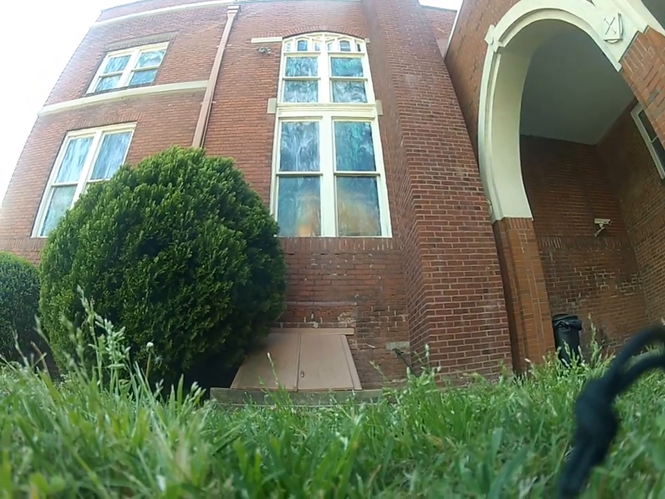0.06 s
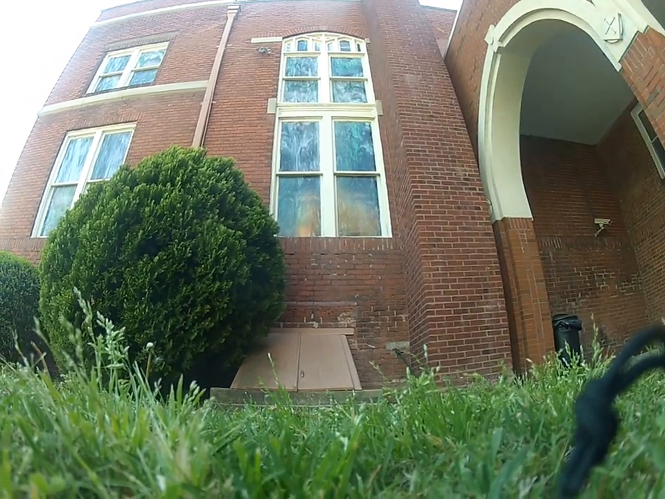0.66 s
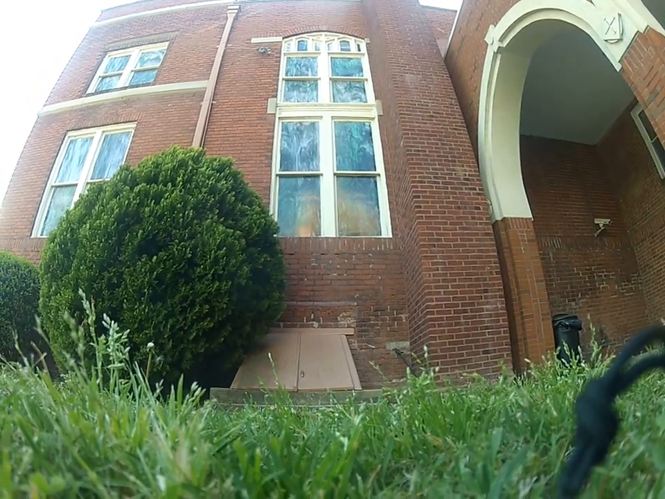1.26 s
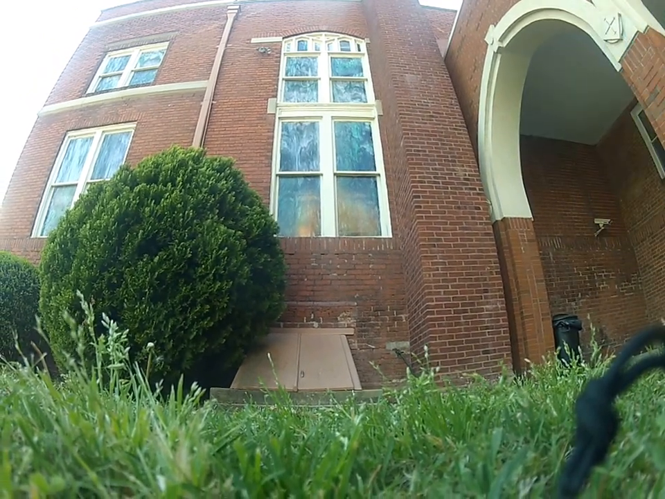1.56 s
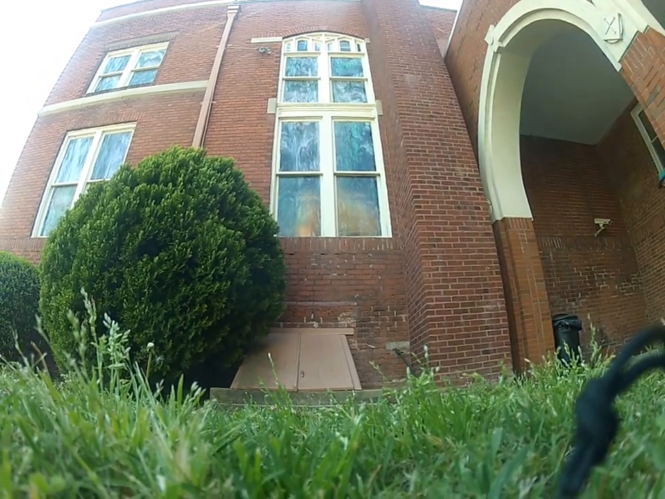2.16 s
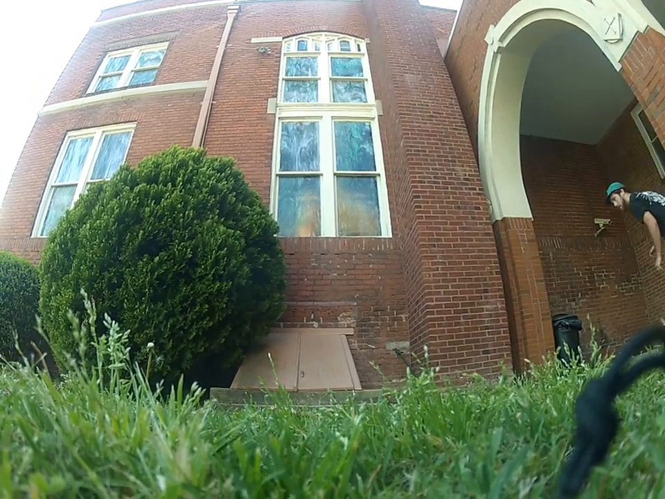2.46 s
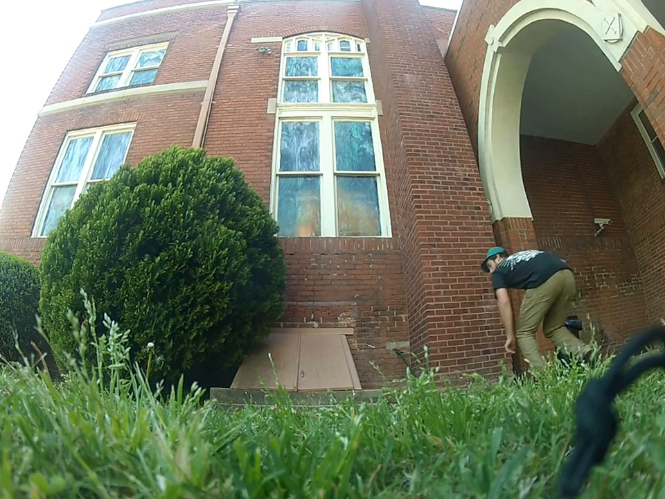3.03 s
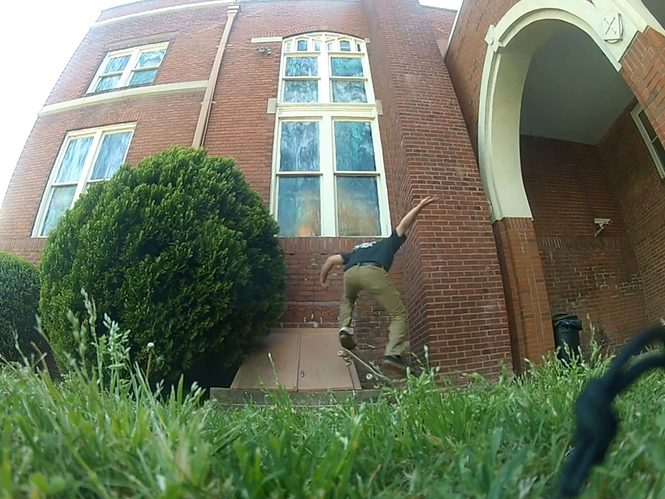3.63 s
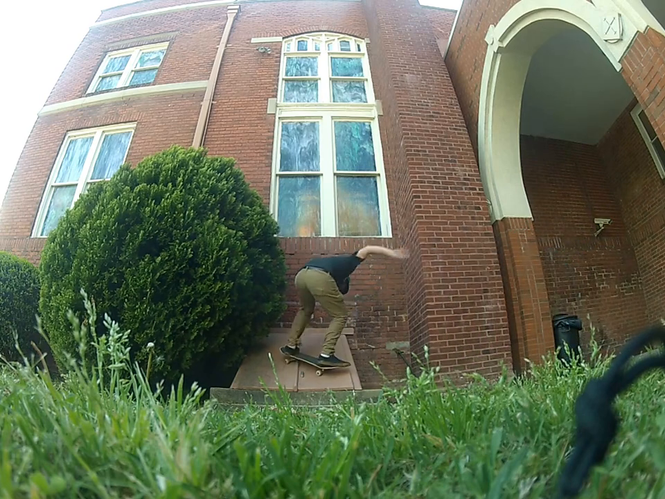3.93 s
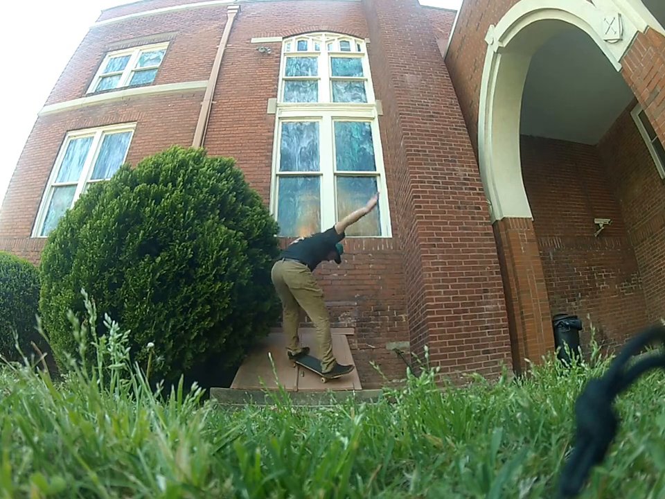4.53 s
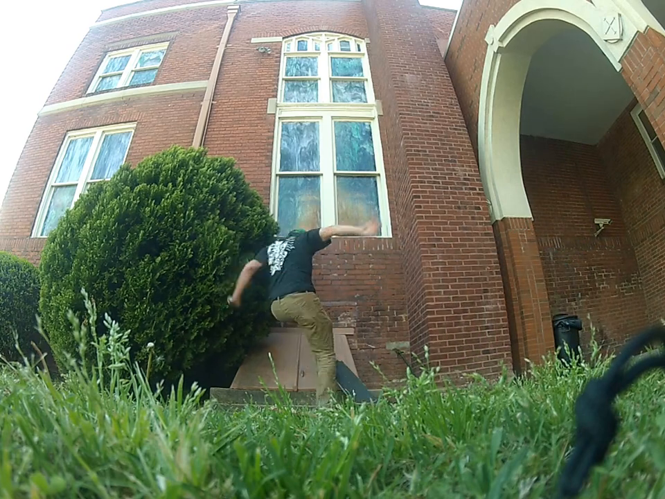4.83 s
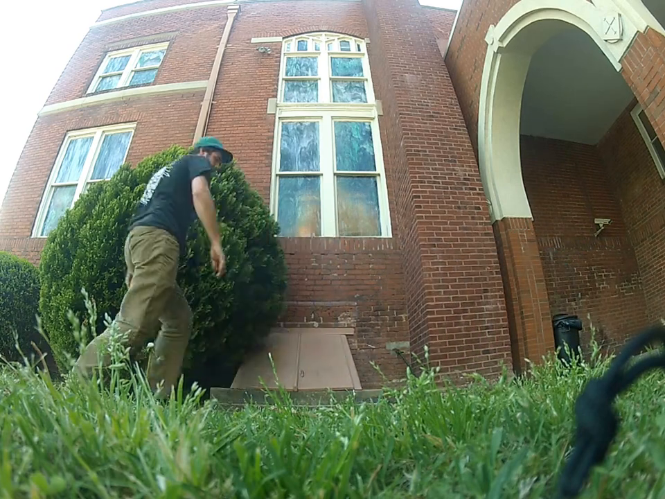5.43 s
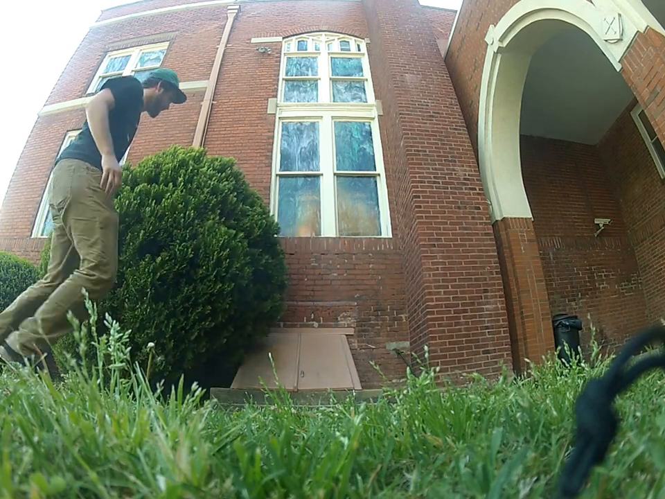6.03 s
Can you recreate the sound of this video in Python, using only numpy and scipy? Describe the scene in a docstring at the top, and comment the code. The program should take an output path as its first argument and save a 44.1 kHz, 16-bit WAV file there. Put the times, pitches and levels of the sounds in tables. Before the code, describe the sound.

A skateboard clacks down, rolls, bangs across a booming metal cellar door, then tumbles off and rolls away, sounding muffled outdoors.

```python
"""Skateboard over a cellar door

A skateboard is thrown down in a brick porch, rolls out and pops onto a slanted steel cellar door.
The door booms and rattles, a wheel squeals in the turn, then the board drops off, tumbles and rolls away.
Before all this, a bird chirps and a shoe scuffs; a town rumbles far away throughout.
Most of the sound lies below 700 Hz, muffled as if by a closed camera case lying in the grass."""
import sys
import numpy as np
from scipy import signal
from scipy.fft import rfft, irfft
from scipy.io import wavfile
from scipy.ndimage import map_coordinates

SR = 44100
rng = np.random.default_rng(int(sys.argv[2]) if len(sys.argv) > 2 else 0)


def unload_audio(sound):
    """Save the sound as a 16-bit wav file, at the path given as the first command line argument."""
    columns = np.transpose(np.atleast_2d(sound))
    # keep every value between -1 and 1, then stretch to whole-number steps
    steps = np.round(np.clip(columns, -1, 1) * 32767)
    wavfile.write(sys.argv[1], SR, steps.astype(np.int16))


N = 277248
REACH_DOOR_S, LEAVE_DOOR_S = 3.7, 4.9


def amp(db):
    """Turn decibels into a multiplier."""
    return 10 ** (np.asarray(db) / 20)


def unit(x):
    """Scale a sound to an average (rms) level of 1."""
    return x / np.sqrt(np.mean(x ** 2) + 1e-20)


def gain(spectrum, size):
    """A tone curve through (pitch_hz, level_db) points, falling 36 dB an octave past both ends."""
    hz, db = np.transpose(spectrum)
    octave = np.log2(np.fft.rfftfreq(size, 1 / SR) + 1)
    outside = np.abs(octave - np.clip(octave, np.log2(hz[0]), np.log2(hz[-1])))
    return amp(np.interp(octave, np.log2(hz), db) - 36 * outside) + 1e-6


def noise(spectrum):
    """Noise with this tone colour, at an average level of 1."""
    return unit(irfft(rfft(rng.standard_normal(N)) * gain(spectrum, N), N))


def pulse(spectrum, size=4096):
    """The shortest tap with this tone colour (a minimum-phase pulse)."""
    cepstrum = irfft(np.log(gain(spectrum, size)))
    cepstrum[1:size // 2] *= 2
    cepstrum[size // 2 + 1:] = 0
    return irfft(np.exp(rfft(cepstrum)))


def wobble(rate):
    """A smooth curve through `rate` random points a second."""
    return map_coordinates(rng.standard_normal(int(N * rate / SR) + 4), [np.arange(N) * rate / SR])


def fade(fade_s):
    """A one-second curve that falls by 60 dB every fade_s."""
    return np.exp(-np.log(1000) * np.arange(SR) / SR / fade_s)


def since(s):
    """Seconds gone by since time s, zero before it."""
    return np.maximum(np.arange(N) / SR - s, 0)


def swell(start, end, rise_s, fall_db_per_s):
    """A level that rises from the start, holds to the end, then dies away."""
    return np.minimum(since(start) / rise_s, 1) * amp(-fall_db_per_s * since(end))


def add(track, s, sound):
    """Mix a sound in at time s."""
    part = track[round(s * SR):][:len(sound)]
    part += sound[:len(part)]


def ring(notes, attack_s, spread_db, detune):
    """A struck object, peak 1; each blow shares its force differently among the notes."""
    t = np.arange(SR) / SR
    sound = np.zeros(SR)
    for hz, db, fade_s in notes:
        force = amp(db + spread_db * rng.normal()) * rng.choice([-1, 1])
        sound += force * fade(fade_s) * np.sin(2 * np.pi * hz * (1 + detune * rng.normal()) * t)
    sound *= 1 - np.exp(-t / attack_s)
    return sound / np.abs(sound).max()


def echoed(sound, colour, early_db, early_s, late_db, late_s):
    """A sound of peak 1, then a wash of echoes: one part fades quickly, one slowly."""
    scatter = unit(irfft(colour * np.exp(2j * np.pi * rng.random(len(colour))), SR))
    envelope = np.hypot(amp(early_db) * fade(early_s), amp(late_db) * fade(late_s))
    direct = np.pad(sound, (0, SR - len(sound))) / np.abs(sound).max()
    return direct + scatter * envelope * (1 - fade(0.03))


# Tone of far traffic: pitch_hz, level_db
TRAFFIC_TONE = [(22, -28), (35, -3.5), (60, -3.5), (130, -1.5), (220, -3.5), (420, -8.5), (620, -7),
                (720, -11), (850, -20.5), (1000, -24), (1400, -37), (2800, -40.5), (4200, -48.5),
                (5800, -56.5)]


def town():
    """Far traffic rumbles under a faint steady whine."""
    whine = amp(-84) * noise([(4950, -24), (5110, 0), (5270, -24)])
    return amp(-37 + 0.37 * wobble(24)) * noise(TRAFFIC_TONE) + whine


def bird():
    """One faint far chirp, smeared by distance."""
    t = np.arange(N) / SR
    chirp = np.exp(-((t - 1.355) / .055) ** 2)
    return amp(-72) * chirp * noise([(2800, -25), (3300, -8), (3600, 7), (3900, -25)])


# Shoe scuffs before the run-up: start_s, level_db
SHOE_SCUFFS = [(1.543, -46.5), (1.612, -43.5)]
# Tones of the scrape and of the hollow echo: pitch_hz, level_db
SCRAPE_TONE = [(1200, -18), (2100, -12), (2550, -9), (2850, 1), (3350, -9), (3900, -7), (4300, -19),
               (5500, -27)]
HOLLOW_TONE = [(150, -32), (300, -8.5), (410, -18), (455, 1.5), (500, -4.5), (575, -4), (620, 4),
               (665, -3.5), (770, -8.5), (850, -13), (950, -20.5), (1100, -25), (1600, -38)]


def scuffs():
    """Short bright scrapes of a shoe linger a little and stir the hollow porch."""
    out, t = np.zeros(N), np.arange(N) / SR
    for s, db in SHOE_SCUFFS:
        scrape = np.exp(-((t - s) / 0.0088) ** 2)
        linger = amp(-12.5) * swell(s, s, rise_s=.004, fall_db_per_s=68)
        stir = amp(7) * swell(s, s, rise_s=.005, fall_db_per_s=28)
        out += amp(db) * ((scrape + linger) * noise(SCRAPE_TONE) + stir * noise(HOLLOW_TONE))
    return out


# Single knocks of tail, wheel or deck edge: start_s, level_db, thud_offset_db, click_offset_db
BOARD_KNOCKS = [(1.883, -7.5, -20, -26.5), (1.908, -0.5, -42, -20.5), (2.767, -17.5, -2.5, -22),
                (2.797, -11, -11, -23), (2.828, -15, -8, -21), (3.363, -13, -1.5, -23),
                (3.409, -15, 2, -21), (3.522, -17.5, -5, -23), (3.567, -8.5, -11.5, -18.5),
                (3.802, -8.5, -25, -20), (3.838, -4, -15, -38), (3.899, -6.5, -16.5, -19),
                (3.945, -11.5, -4.5, -23), (4.332, -23, -0.5, -24), (4.4, -20.5, -25, -26),
                (4.57, -10.5, -12, -15), (4.597, -9, -6.5, -34), (4.784, -4.5, -22, -31.5),
                (4.795, -2.5, -22, -35.5), (4.965, -16, -2, -17.5), (4.996, -11, -27, -20.5),
                (5.05, -6.5, -24, -19.5), (5.119, -15, -7, -20.5), (5.178, -11, -20, -18),
                (5.191, -12.5, -26, -27), (5.397, -16.5, -8, -12), (5.424, -15, -28, -36),
                (5.984, -25.5, -25, -29), (6.047, -45, -9, -3), (6.212, -40, -24, -10)]
# The board comes down: start_s, gap_s, level_db, thud_offset_db, click_offset_db, loss_per_touch_db
# (a negative loss means the weight is building)
BOARD_LANDINGS = [(1.896, .049, 0, -23, -27.5, 3.5), (2.588, .018, -9.5, 0, -24.5, -0.2),
                  (3.736, .0168, -4, -5.5, -25, 1), (4.652, .0195, -2.5, -15, -27, 0.5)]


def blows(start, end):
    """List the blows between two times: four touches for each landing, plus the single knocks."""
    touches = [(s + k * gap_s, db - k * loss_db, thud_offset, click_offset)
               for s, gap_s, db, thud_offset, click_offset, loss_db in BOARD_LANDINGS for k in range(4)]
    return [row for row in touches + BOARD_KNOCKS if start <= row[0] < end]


# Notes of the bending wooden deck, and of its edge and metal axles: pitch_hz, level_db, fade_s
DECK_NOTES = [(316, 2.5, 0.018), (496, -8.5, 0.086), (544, 11, 0.014), (633, 4.5, 0.029),
              (671, -5.5, 0.035), (784, -11, 0.037), (870, -21.5, 0.014)]
CLACK_NOTES = [(1090, -3, 0.0075), (1330, -6.5, 0.011), (1730, 4, 0.0065), (2090, -9, 0.019),
               (2300, -4, 0.0075), (2777, -3.5, 0.013), (3415, -1, 0.0067), (4000, -21, .004)]
# Tones of a dull thud and a bright click: pitch_hz, level_db
THUD_TONE = [(25, -26), (70, -19.5), (135, 0.5), (175, -5.5), (240, 0.5), (380, -3.5), (700, -21),
             (1500, -76)]
CLICK_TONE = [(500, -33), (1000, -2), (1350, 2), (1650, -2), (2050, 0.5), (2350, -0.5), (2900, 3.5),
              (3400, -2), (3900, 0), (4500, -8), (5300, -7.5), (6000, -18.5)]


def board_hits(rows, deck_pitch, thud_pitch, knock_db, thud_db, click_db, scatter_db, rattle_db,
               knock_tail_db, thud_tail_db, click_tail_db, tail_s):
    """Each blow knocks the deck, thuds through the ground and clacks the axles; brick walls echo it."""
    out = np.zeros(N)
    bending = np.multiply(DECK_NOTES, [deck_pitch, 1, 1])  # a deck with no feet on it rings higher
    hollow = gain(np.multiply(HOLLOW_TONE, [deck_pitch, 1]), SR)
    ground = np.multiply(THUD_TONE, [thud_pitch, 1])  # the heavier the footing, the deeper the thud
    push, rumble, rattle = pulse(ground), gain(ground, SR), gain(CLICK_TONE, SR)
    for s, db, thud_offset, click_offset in rows:
        deck = ring(bending, attack_s=0.0015, spread_db=3.5, detune=0.011)
        edge = ring(CLACK_NOTES, attack_s=0.0047, spread_db=2.0, detune=0.068)
        knock = amp(knock_db) * echoed(deck, hollow, scatter_db, 0.18, knock_tail_db, tail_s)
        thud = amp(thud_db + thud_offset) * echoed(push, rumble, -3.4, 0.089, thud_tail_db, tail_s)
        click = amp(click_db + click_offset) * echoed(edge, rattle, rattle_db, 0.087, click_tail_db, tail_s)
        add(out, s + 0.00151, amp(db) * (knock + thud + click))
    return out


# Spells of rolling: start_s, end_s, hum_db, grit_db, weight_offset_db (added to hum_db), jolt_db
ROLL_SPELLS = [(1.967, 2.53, -37, -66, 0.5, 18), (2.638, 3.467, -30.5, -61.5, 0.5, -10),
               (3.803, 4.115, -23, -46.5, -1.5, -2), (4.338, 4.415, -36, -66, 4, 4),
               (4.607, 4.863, -34, -62, 1.5, 5), (4.982, 5.476, -26.5, -55.5, -7.5, -2.5),
               (5.496, 6.048, -39, -60, -25, -1.5)]
# Tones of the rolling hum and of the rumble under the rider's weight: pitch_hz, level_db
HUM_TONE = [(200, -15), (380, -32), (480, -1.5), (620, 9), (720, -2.5), (850, -11.5), (1100, -32),
            (2000, -61)]
WEIGHT_TONE = [(50, -41), (110, -5), (160, 2.5), (230, -1.5), (340, -2), (450, -3), (560, -2), (750, -25)]


def rolling():
    """Rough paving makes the deck hum, and rumble when it carries weight; grit crackles underneath."""
    hum, grit, weight = np.zeros((3, N))
    for start, end, hum_db, grit_db, weight_offset, jolt_db in ROLL_SPELLS:
        jolt = amp(jolt_db * np.exp(-since(start) / 0.21))  # starts louder or softer, then settles
        shake = jolt * swell(start, end, rise_s=0.032, fall_db_per_s=121)
        hum = np.hypot(hum, amp(hum_db) * shake)
        grit = np.hypot(grit, amp(grit_db) * shake)
        weight = np.hypot(weight, amp(hum_db + weight_offset) * shake)
    bumps = amp(1.3 * wobble(25))
    stone_hits = rng.random(N) < 900 / SR  # about 900 a second
    stones = stone_hits * rng.standard_normal(N) * amp(3.5 * rng.standard_normal(N))
    crackle = unit(signal.fftconvolve(stones, pulse(CLICK_TONE))[:N])
    body = amp(-2.0) * (hum * noise(HUM_TONE) + weight * noise(WEIGHT_TONE))
    return bumps * (body + grit * (amp(-2.5) * crackle + amp(1) * noise(CLICK_TONE)))


# Notes of the steel door panels: pitch_hz, level_db, fade_s
STEEL_NOTES = [(80.2, 0.5, 0.65), (107, -5, 0.49), (134.6, -8, 0.53), (174, -23, .5), (214, 6, 0.5),
               (249, -17, 0.24), (291.3, -2, 0.88), (323, 3, 0.24), (348, -1, 0.34), (437, -7, 0.46),
               (536, 1, 0.53), (590, -16, 0.27)]
# The door bends as the weight on it shifts: start_s, end_s, boom_db, rumble_db
DOOR_BENDS = [(3.72, 3.85, -31, -26), (3.88, 4.2, -28, -17), (4.453, 4.55, -34.5, -34.5),
              (4.566, 4.89, -39, -18.5), (4.959, 5.15, -37, -20.5)]
# Tone of its deep boom: pitch_hz, level_db
BOOM_TONE = [(24, -28), (32, -1), (38, -6), (46, -10), (70, -12.5), (200, -60)]


def door():
    """The steel rings at each blow; each bend sets off a short rumble, and booms while it lasts."""
    ringing, boom, rumble = np.zeros((3, N))
    for s, db, thud_offset, _ in blows(REACH_DOOR_S, LEAVE_DOOR_S):
        steel = ring(STEEL_NOTES, attack_s=0.0063, spread_db=4.5, detune=0.011)
        add(ringing, s, amp(db + thud_offset - 2.0) * steel)
    for start, end, boom_db, rumble_db in DOOR_BENDS:
        bent = swell(start, end, rise_s=0.037, fall_db_per_s=100)
        shudder = swell(start, start + 0.091, rise_s=0.037, fall_db_per_s=57)
        boom = np.hypot(boom, amp(boom_db) * bent)
        rumble = np.hypot(rumble, amp(rumble_db) * shudder)
    return ringing + boom * noise(BOOM_TONE) + amp(-2.0) * rumble * noise(THUD_TONE)


# All the rider's weight lands on the steel: start_s, level_db
DOOR_SLAM = [(3.738, 3)]
# Tones of the steel sheet's slap and its hinges' buzz: pitch_hz, level_db
SLAP_TONE = [(60, -2.5), (250, 3.5), (500, 8), (900, -20), (1500, -21), (2500, -36), (4000, -37),
             (6000, -53)]
HINGE_TONE = [(1500, -24), (3000, 4), (4500, 1), (5300, 2), (6000, -6)]


def slam():
    """The landing slaps the sheet in one hard push and sets the hinges buzzing."""
    out = np.zeros(N)
    slap, buzz = pulse(SLAP_TONE), gain(HINGE_TONE, SR)
    for s, db in DOOR_SLAM:
        add(out, s, amp(db) * echoed(slap, buzz, early_db=-39, early_s=0.19, late_db=-39, late_s=0.82))
    return out


def squeal():
    """A skidding wheel sticks and slips; its shaky pitch sinks as it slows, and the deck rasps along."""
    start_s, end_s, start_hz, sag_hz_per_s = 4.069, 4.11, 465.5, 210
    pitch_hz = (start_hz - sag_hz_per_s * since(start_s)) * (1 + .05 * wobble(300))
    phase = 2 * np.pi * np.cumsum(pitch_hz) / SR
    tone = np.sin(phase) + amp(-28) * np.sin(2 * phase) + amp(-41.5) * np.sin(3 * phase)
    skid = swell(start_s, end_s, rise_s=0.018, fall_db_per_s=133)
    return amp(-15) * skid * (unit(tone) * amp(2.4 * wobble(140)) + amp(-14) * noise(HUM_TONE))


def scene():
    """The porch is far and echoing; the door and the paving in front are nearer and echo less."""
    porch = board_hits(blows(0, REACH_DOOR_S), deck_pitch=0.98, thud_pitch=0.88,
                       knock_db=-4.5, thud_db=-1, click_db=-2.5, scatter_db=-7.5, rattle_db=-2.5,
                       knock_tail_db=-12, thud_tail_db=-16, click_tail_db=-14, tail_s=0.58)
    ride = board_hits(blows(REACH_DOOR_S, LEAVE_DOOR_S), deck_pitch=0.97, thud_pitch=1.035,
                      knock_db=-0.5, thud_db=2.5, click_db=6, scatter_db=-12.5, rattle_db=-10,
                      knock_tail_db=-20, thud_tail_db=-12, click_tail_db=-18, tail_s=0.73)
    tumble = board_hits(blows(LEAVE_DOOR_S, N / SR), deck_pitch=1.059, thud_pitch=1.3,
                        knock_db=0.5, thud_db=-3.5, click_db=9.5, scatter_db=-9.5, rattle_db=-16.5,
                        knock_tail_db=-17.5, thud_tail_db=-10, click_tail_db=-23, tail_s=0.76)
    skating = porch + ride + tumble + slam() + door() + rolling() + squeal()
    return (skating + scuffs() + bird() + town())[None]


def record(dry):
    """The camera cuts the deepest bass, clips loud peaks and holds each sample for 1/12000 s."""
    hold_hz, top_hz = 12000, 15300
    hz = np.fft.rfftfreq(N, 1 / SR)
    bass_cut = signal.sosfilt(signal.butter(6, 31, "highpass", fs=SR, output="sos"), dry[0])
    spectrum = rfft(np.clip(bass_cut, -1, 1))
    # the held steps mirror the sound on both sides of the hold rate: a thin sizzle
    offset_hz = np.abs(hz - hold_hz)
    mirror = spectrum[np.rint(offset_hz * N / SR).astype(int)] * offset_hz / (hz + 1)
    mirror = np.where(hz < hold_hz, -mirror.conj(), mirror)
    held = np.where(hz < hold_hz / 2, spectrum, mirror)
    return irfft(held * (hz < top_hz), N)[None]


dry = scene()
out = record(dry)
unload_audio(out)
```